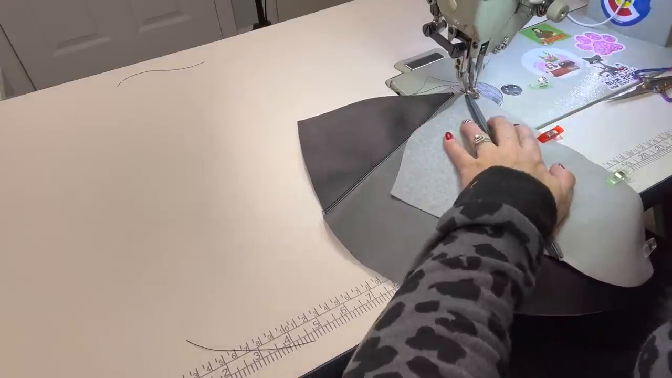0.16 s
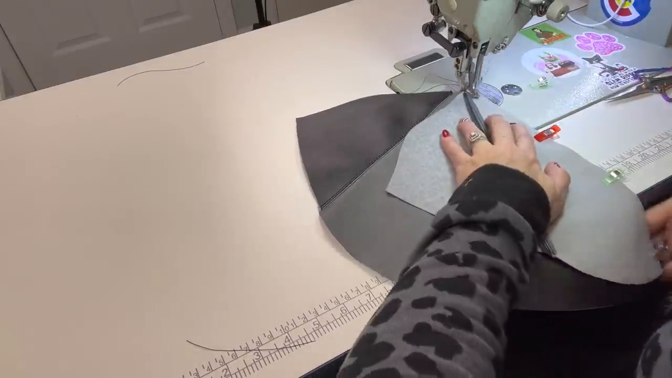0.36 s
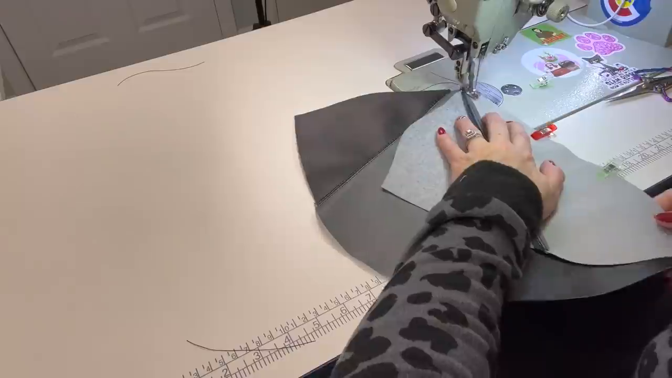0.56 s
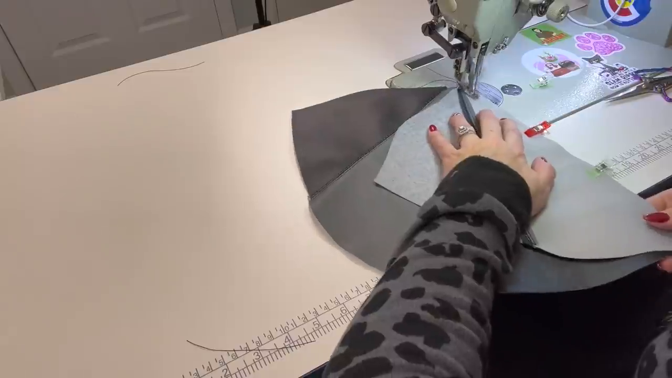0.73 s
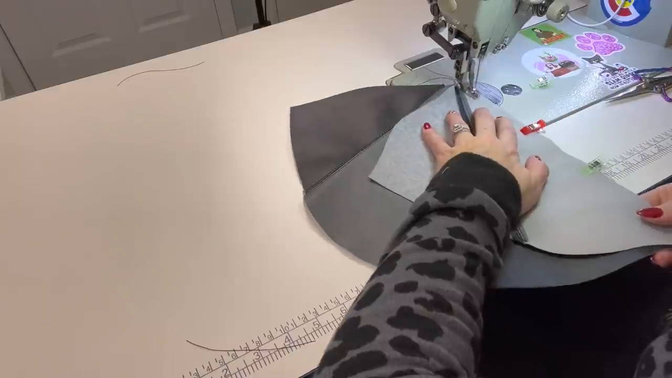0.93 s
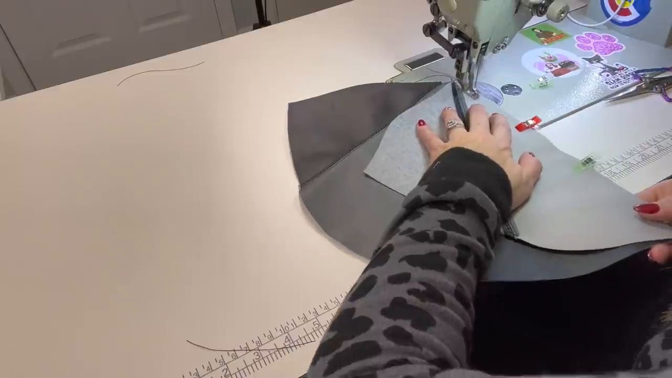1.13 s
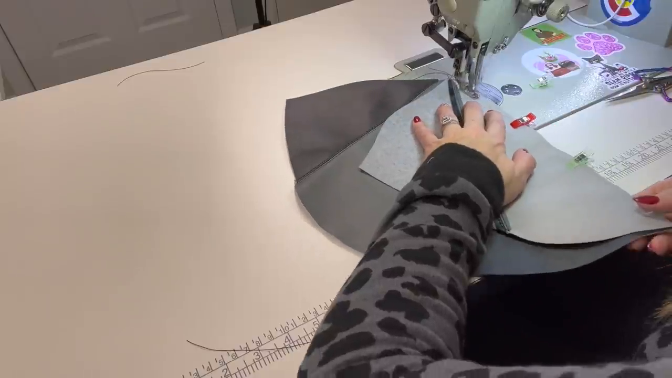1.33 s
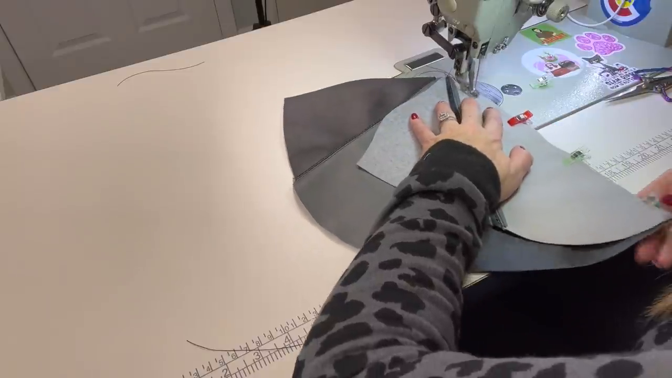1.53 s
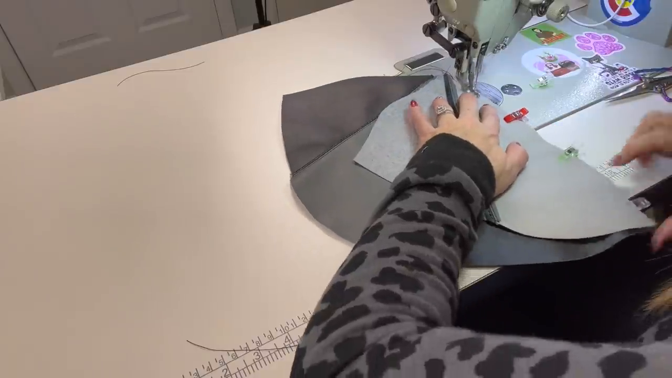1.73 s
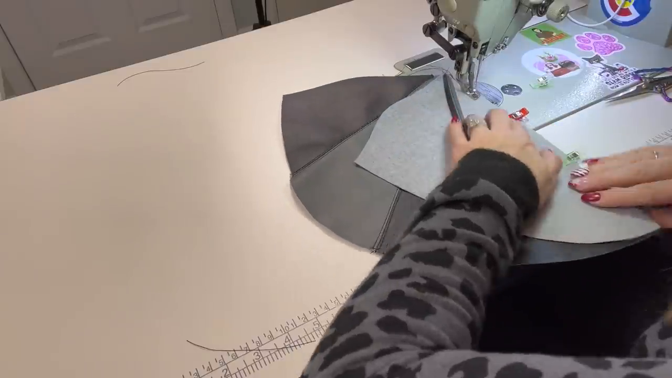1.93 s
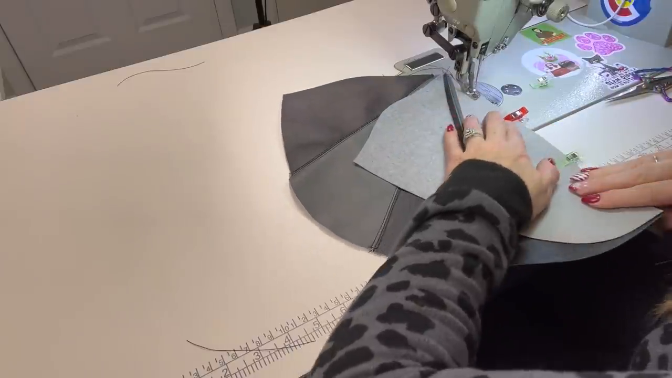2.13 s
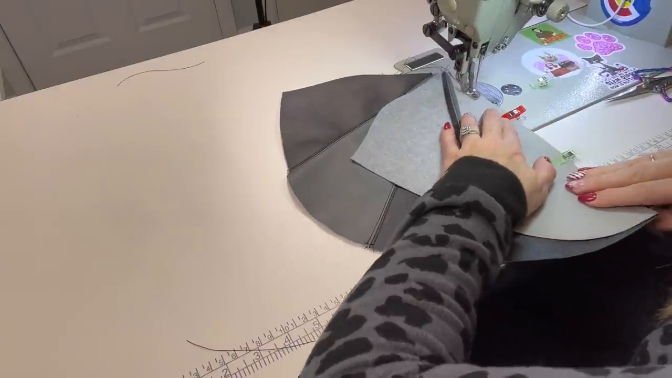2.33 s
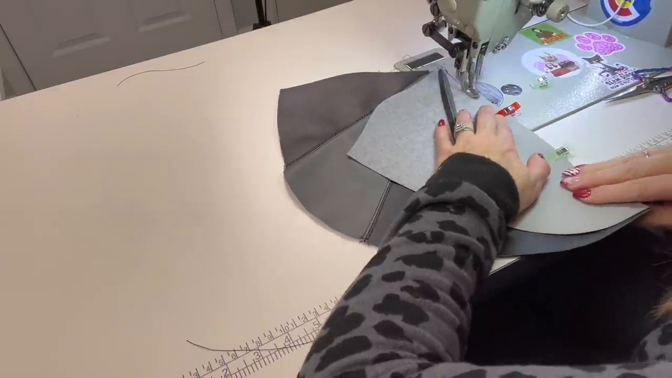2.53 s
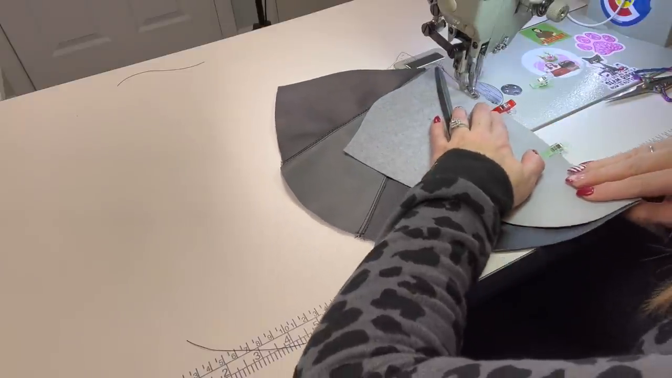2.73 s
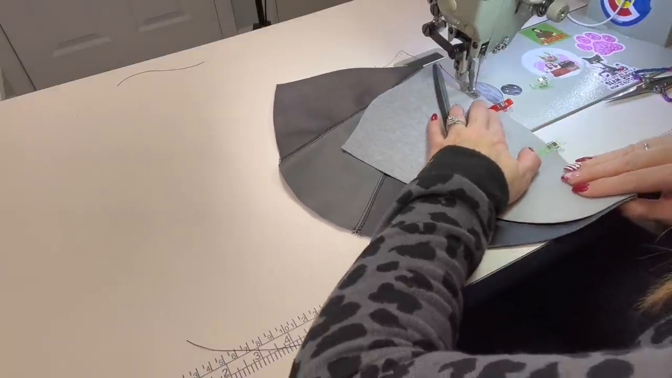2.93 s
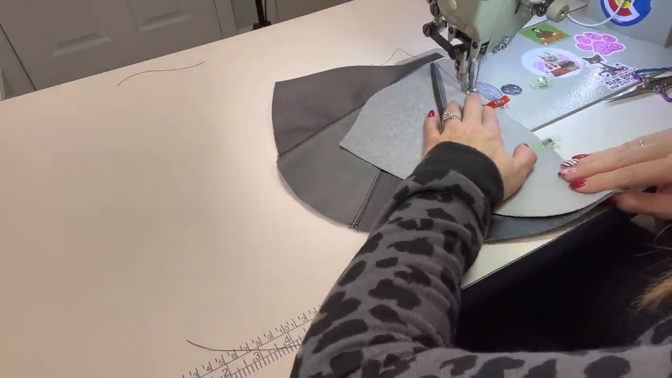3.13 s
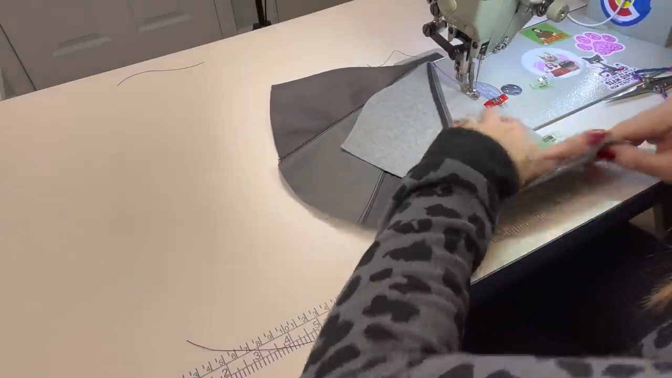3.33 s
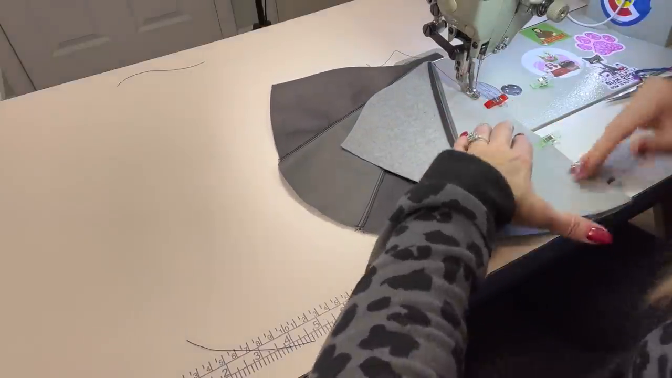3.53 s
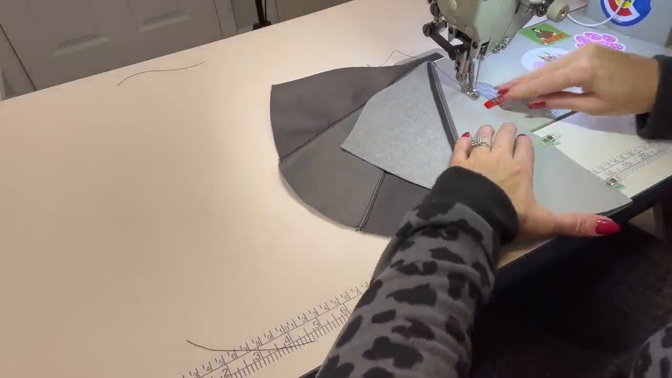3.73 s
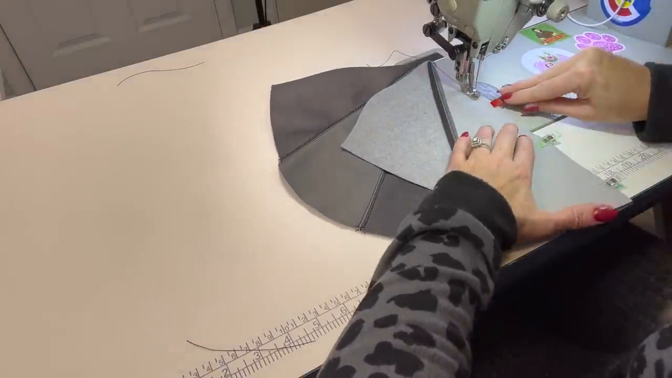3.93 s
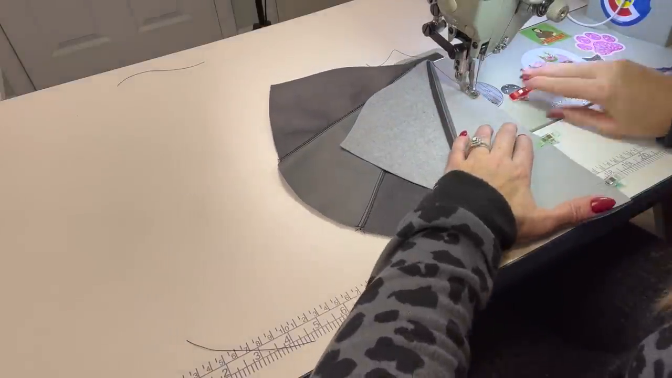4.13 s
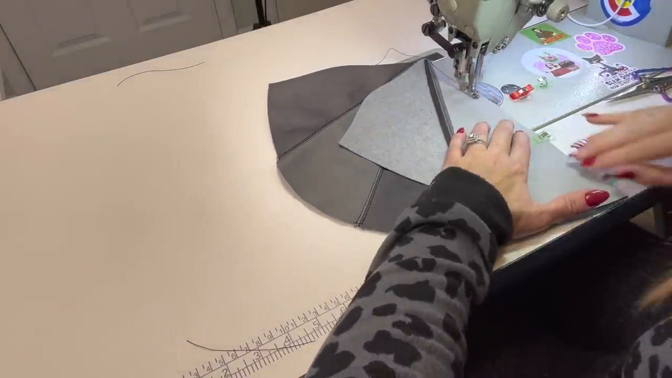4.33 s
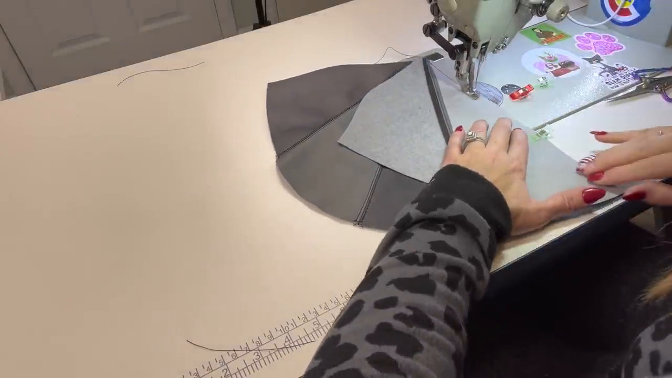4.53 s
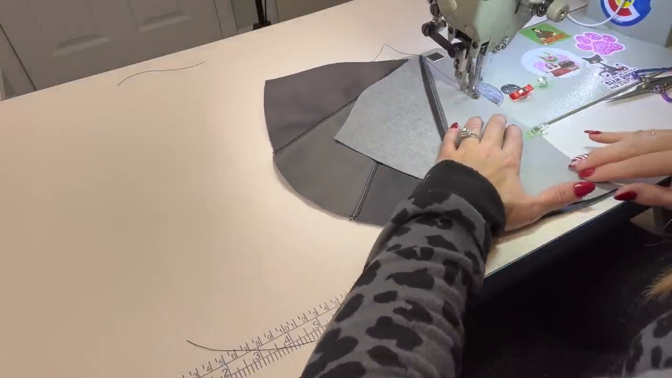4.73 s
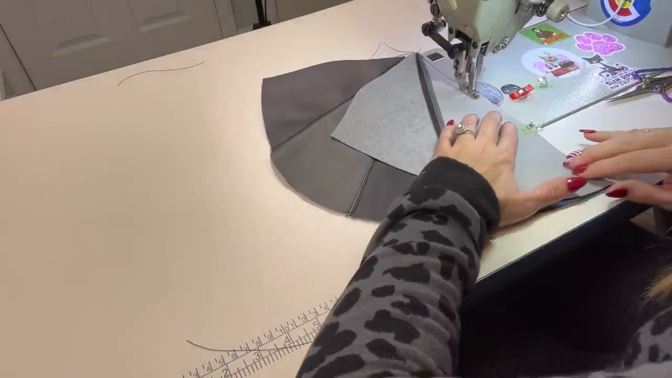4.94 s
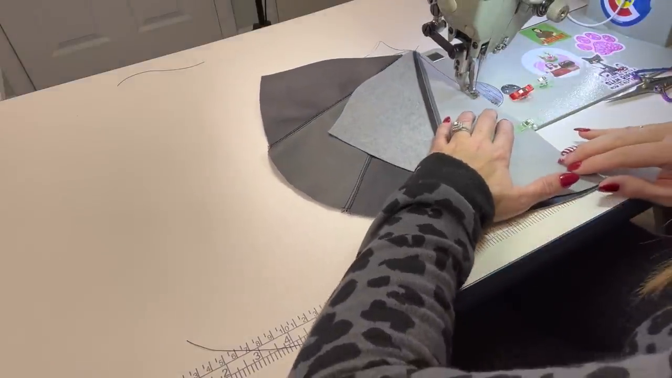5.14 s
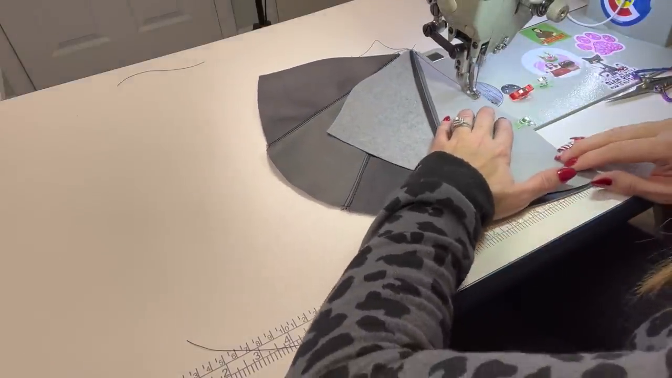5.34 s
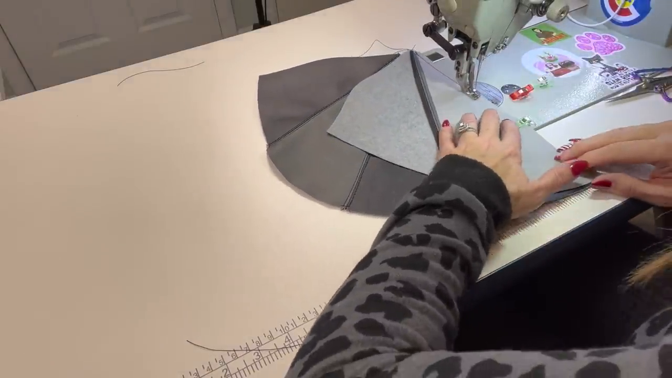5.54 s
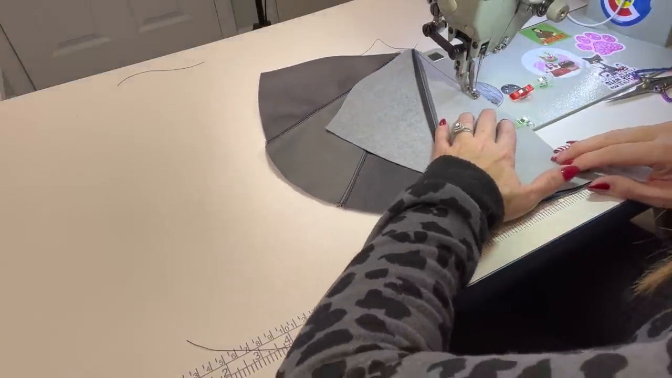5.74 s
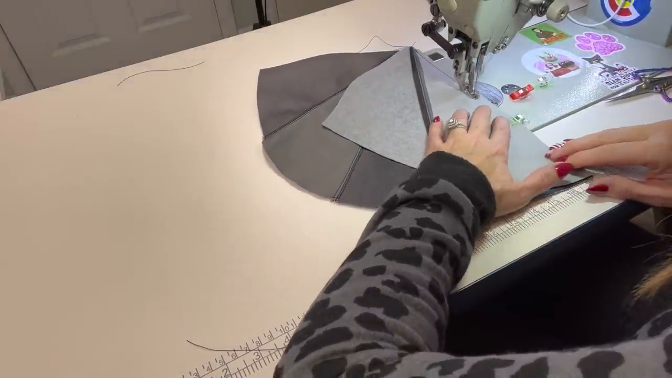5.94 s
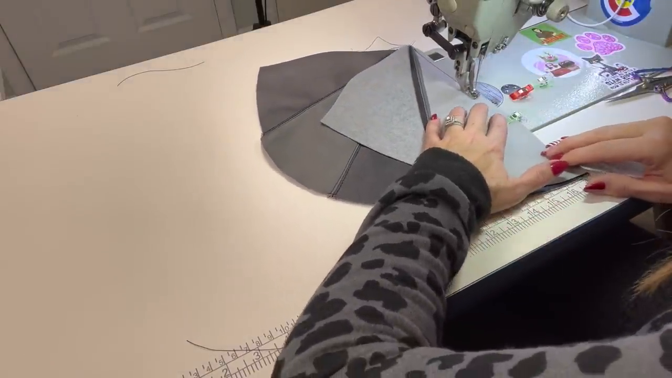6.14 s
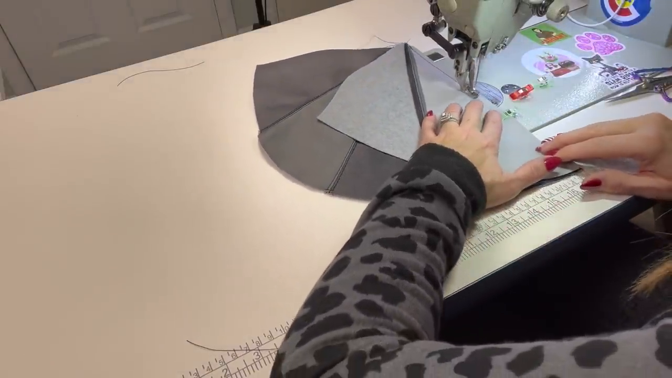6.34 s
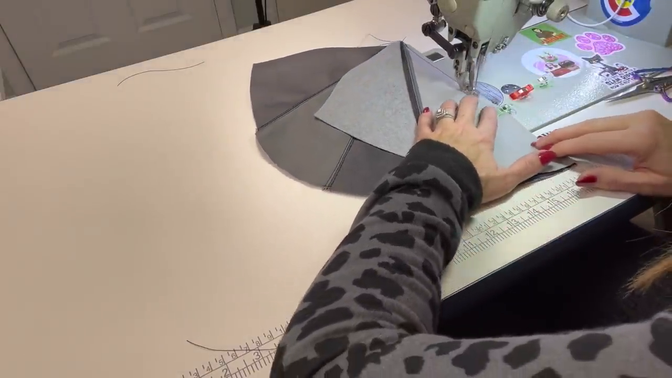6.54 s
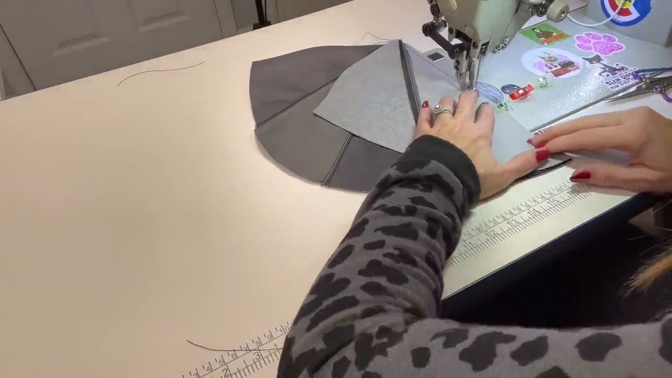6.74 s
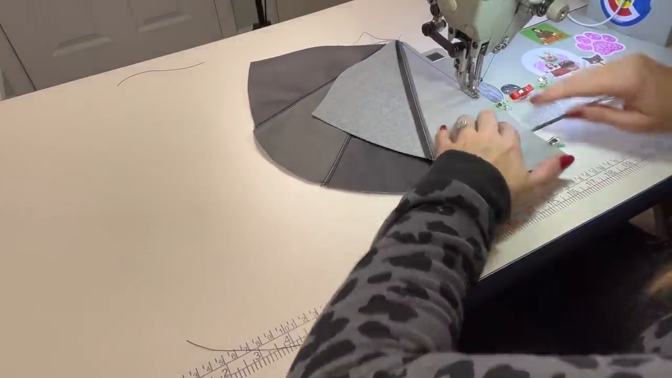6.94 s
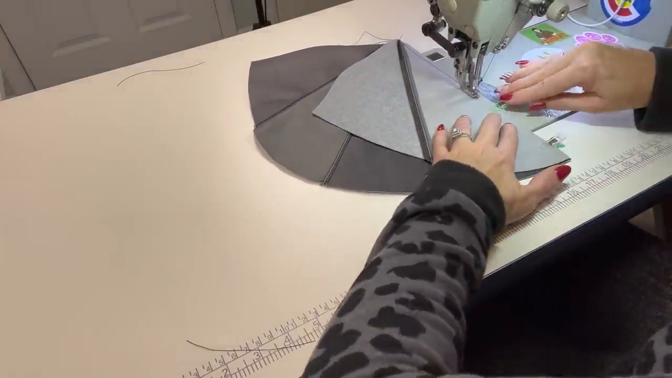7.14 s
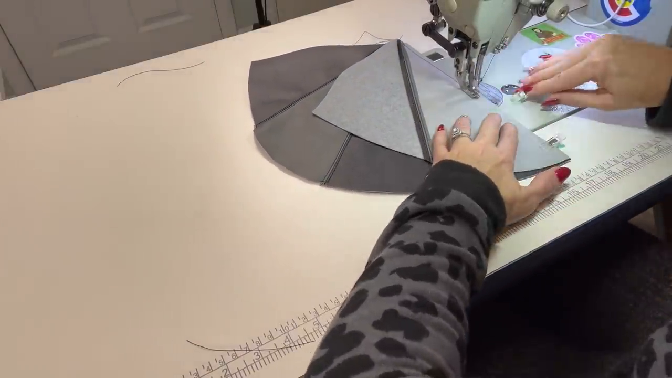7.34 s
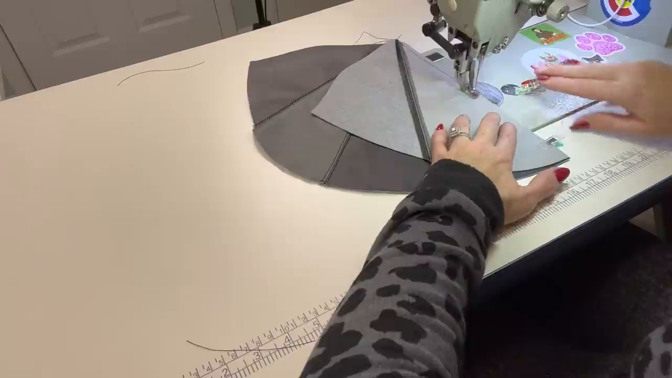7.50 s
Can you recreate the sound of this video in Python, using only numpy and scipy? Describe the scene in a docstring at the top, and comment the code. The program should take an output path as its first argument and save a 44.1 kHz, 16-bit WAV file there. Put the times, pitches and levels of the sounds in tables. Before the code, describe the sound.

An industrial sewing machine stitches in short stop-start bursts, knocking and rattling rapidly, with braking thuds, small clicks and a plastic clip dropping.

```python
"""A few small clicks come first, over a quiet room with a faint mains hum; then a sewing machine
stitches in short runs. Each shaft turn knocks the casting, clicks the hook and feed dogs and shakes
the table top. Braking jolts the table, and a plastic clip drops onto the machine bed.
Noise pushes and rubbing excite banks of resonances; a small room rings briefly and a phone
hears it all through two microphone ports."""
import sys
import numpy as np
from scipy import signal
from scipy.fft import rfft, irfft
from scipy.io import wavfile
from scipy.ndimage import uniform_filter1d

SR = 44100
rng = np.random.default_rng(int(sys.argv[2]) if len(sys.argv) > 2 else 0)


def generate_wav(signal):
    """Clip the signal to [-1, 1] and save it as 16-bit WAV at the path in sys.argv[1]."""
    frames = np.transpose(np.atleast_2d(signal))
    scaled = np.clip(frames, -1, 1) * 32767
    pcm = np.round(scaled).astype(np.int16)
    wavfile.write(sys.argv[1], SR, pcm)


N = 338247

# In all tables level_db is relative; other gains may follow.
# Colour of the room tone: pitch_hz, level_db
AIR_COLOUR = [(18, -59.5), (30, -21.5), (43, -14), (90, -21.5), (124, -4), (174, -18), (295, -20),
              (336, -23), (616, -24.5), (844, -30.5), (2200, -51), (16000, -72)]
AIR_LEVEL_DB, HUM_LEVEL_DB = -60.5, -62.5

# How much of each pitch the room returns: pitch_hz, level_db
ROOM_COLOUR = [(100, -23.5), (300, -13), (600, -3.5), (3000, -5), (7000, -4), (14000, 1.5)]
ROOM_T60_S, ROOM_TREBLE_T60_S = 0.48, 0.19  # time to fade by 60 dB
KNOCK_ROOM_DB, CRACK_ROOM_DB = -4, -9  # these sound close by, so the room gets less of them

# Phone shell, lead of the left port: pitch_hz, phase_radians
PORT_PHASE = [(20, 0), (100, -.1), (300, -.4), (700, -1.3), (1400, -1.6), (2600, -3.6), (4400, -5),
              (5900, -6.2), (6300, -9.4), (8500, -9.5), (10200, -12.6), (12700, -12.4), (14000, -15.8)]
# Phone shell, left port minus right: pitch_hz, level_db
PORT_GAIN = [(60, 2), (110, -2), (200, 2), (380, -1.5), (700, -5), (1290, -2), (2380, -0.5), (4400, -4),
             (8120, -1.5), (15000, 1)]
TOP_HZ = 16400  # nothing is heard above this

# Plastic clip landing and bouncing on the bed: start_s, level_db
CLIP_BOUNCES = [(3.537, -35.5), (3.557, -41), (3.573, -45)]
# Resonances of that landing: pitch_hz, width_hz, level_db
CLIP_RING = [(497, 250, -8), (800, 170, -2.5), (966, 130, -1.5), (1600, 460, -5.5), (2580, 450, -12),
             (4300, 340, -5)]

CRACKS = [(1.8213, -21), (3.5368, -15)]
# Their tone: pitch_hz, level_db
CRACK_COLOUR = [(300, -16), (1200, -5.5), (3200, -2.5), (4300, 1), (5600, -12.5), (7000, -2.5), (12000, -3),
                (16000, 0)]

# Dull knock as the drive takes hold: start_s, level_db
CATCH = [(7.447, -34)]
# Its resonance: pitch_hz, width_hz (one pass), level_db
CATCH_RING = [(900, 1000, 9.1)]

# Jolts of the table as the motor brakes: start_s, level_db, legs_level_db (added for the legs)
JOLTS = [(1.786, -28.5, -3), (1.812, -24.5, -0.5), (3.335, -28, -10), (3.384, -35, -25), (5.401, -32.5, -1),
         (6.88, -33.5, -2)]
# Tone of the thud: pitch_hz, level_db
THUD_COLOUR = [(30, -14), (60, -20), (150, 9), (300, -6), (500, -6.5), (900, -32)]
# Resonance of the table legs: pitch_hz, width_hz, level_db
LEGS_RING = [(56.7, 6, 21)]
BRAKE_RISE_S, BRAKE_FALL_S, BRAKE_SHAKE_DB = 0.045, 0.077, -21  # braking swell, against the jolt

# Lone clicks of slack taken up, of braking and of hands: start_s, level_db, pitch_hz
LONE_CLICKS = [(0.0233, -41.5, 10900), (0.046, -41, 10900), (0.0563, -32, 4400), (0.3047, -26, 4400),
               (1.8222, -28, 4740), (1.829, -40, 4530), (2.147, -37.5, 4250), (2.2154, -40, 4673),
               (2.2293, -32, 4480), (2.2528, -22, 4400), (2.2661, -22.5, 4400), (3.481, -47, 1590),
               (4.0721, -39, 4400), (4.1679, -24.5, 4400), (4.1984, -24.5, 13400), (4.21, -29, 12800),
               (5.6935, -34.5, 9000), (5.778, -36, 4500), (5.7977, -24, 9100), (7.3098, -42.5, 11800),
               (7.3345, -44, 9800), (7.3597, -38, 10600), (7.3746, -32, 5130), (7.381, -34, 2110),
               (7.386, -35.5, 4570), (7.447, -42, 10800)]
# Clicks in each turn, hook then feed dogs: start_s, level_db, pitch_hz
TURN_CLICKS = [(0.467, -25.5, 4300), (0.4956, -30.5, 3800), (0.604, -24.5, 3630), (0.6251, -28, 4650),
               (0.7187, -27.5, 5500), (0.7412, -27, 3820), (0.8557, -26.5, 4550), (0.9557, -29.5, 4460),
               (0.9773, -31, 4900), (1.075, -32, 4300), (1.096, -28.5, 4760), (1.192, -31, 4430),
               (1.3106, -23, 3330), (1.3347, -26.5, 3420), (1.4322, -27.5, 4100), (1.452, -30.5, 4400),
               (1.5515, -27, 3320), (1.5717, -30, 4450), (1.6658, -26, 3300), (1.6926, -26.5, 5530),
               (2.374, -25, 4410), (2.3925, -30, 4450), (2.5091, -27, 4540), (2.6042, -24.5, 4400),
               (2.6251, -28.5, 4500), (2.7235, -33, 4380), (2.7423, -25.5, 4600), (2.8342, -24.5, 4600),
               (2.8584, -24.5, 4500), (2.949, -25.5, 4300), (2.9717, -27.5, 4550), (3.064, -29, 4500),
               (3.0865, -27, 3800), (3.1814, -26.5, 4300), (3.2153, -31.5, 5000), (4.311, -32, 4400),
               (4.3365, -32.5, 3820), (4.4773, -29.5, 4660), (4.584, -27, 3290), (4.6056, -34, 4620),
               (4.7105, -32, 4340), (4.7311, -25.5, 3940), (4.839, -28, 4270), (4.931, -28.5, 4300),
               (4.9485, -28, 4570), (5.039, -26.5, 4700), (5.061, -23, 3640), (5.146, -24.5, 4390),
               (5.168, -30, 4400), (5.2596, -33, 4460), (5.277, -26, 3370), (5.9254, -27.5, 4450),
               (6.057, -30, 3140), (6.0828, -29.5, 3280), (6.1556, -33, 4620), (6.182, -36, 4700),
               (6.261, -42, 4400), (6.276, -31, 4270), (6.354, -35, 4570), (6.3713, -38, 5800),
               (6.4474, -37.5, 4730), (6.4717, -27, 3940), (6.638, -25.5, 3200), (6.6547, -28.5, 4670),
               (6.751, -39, 4480), (6.7732, -27.5, 4600), (7.5161, -29, 4420), (7.5391, -29.5, 4470),
               (7.644, -31, 4480)]

# Needle bar knocks, one per turn; the last row only closes the final turn: start_s, level_db
STITCHES = [(0.221, -36), (0.4311, -35), (0.572, -27.5), (0.689, -26.5), (0.8055, -30), (0.923, -27.5),
            (1.042, -32), (1.1584, -31.5), (1.28, -28), (1.3985, -28.5), (1.5179, -31), (1.6357, -31),
            (1.783, -35), (2.3402, -29.5), (2.4576, -27.5), (2.574, -25.5), (2.6893, -27.5), (2.804, -25),
            (2.9196, -28), (3.034, -27), (3.15, -29), (3.31, -36), (4.274, -27.5), (4.4127, -27.5),
            (4.5503, -26), (4.6788, -29.5), (4.7896, -38), (4.9029, -27), (5.0133, -30), (5.1206, -36),
            (5.228, -26.5), (5.3501, -55), (5.89, -29), (6.025, -29), (6.136, -27.5), (6.234, -30),
            (6.328, -25.5), (6.422, -28), (6.5151, -31), (6.6105, -25.5), (6.7161, -32), (6.8397, -61),
            (7.478, -27.5), (7.6148, -30.5), (7.73, -35)]
# Resonances of a knock: pitch_hz, width_hz, level_db
KNOCK_RING = [(1383, 140, 3), (1640, 136, 6), (2310, 90, 0.5), (2730, 150, -1.5), (3293, 97, 0),
              (4450, 450, -10)]
KNOCK_SCATTER_DB, KNOCK_PITCH_SCATTER = 1.5, .025  # stroke to stroke: level, share of the pitch

# Stitching runs: start_s, halt_s, first_turn_hz (turns a second)
RUNS = [(0.031, 2.097, 2.43), (2.147, 3.72, 3.64), (4.074, 5.655, 4.1), (5.697, 7.053, 4.36),
        (7.303, 8.0, 1.56)]
SPIN_UP_S, STILL_HZ = 0.045, 0.47  # time to take up the drive; turns a second that stand for rest
CRUISE_HZ = 8.5  # turns a second at which the gains below hold
# gain_db at cruise, then db per doubling of speed: below cruise, above cruise
SHAKE_PACE = (-45, 9.6, 14.5)
GRIND_PACE = (-49.5, 10.03, 6.3)
RATTLE_PACE = (-51.5, 10.3, 7.9)
CAM_PACE = (-51, 13.8, -10)

# One shaft turn: angle_turns (0-1), grind_db, rattle_db, cam_rub_db
TURN = [(0, 6, -9.5, -4), (0.201, 0, -8.5, -3.5), (.3, 1, -9, 5.5), (.5, 2.5, -7.5, -4), (.75, -4, -13, -7),
        (.95, -2.5, -11.5, -9), (1, 6.5, -10, 19)]
# Resonances of the table top: pitch_hz, width_hz (one pass), level_db
TABLE_RING = [(61.7, 34, -6), (121.4, 25, 1), (184.7, 16.3, 2), (212.6, 31, -4.5), (302, 24.4, -1),
              (334.6, 26.6, -3.5)]
# Resonances of the casting: pitch_hz, width_hz, level_db
CASTING_RING = [(529, 176, 6), (791, 39, 9), (1075.6, 16.6, 2), (1405, 35, 8.5), (1618, 43, 2.5),
                (2263, 89, 10.5), (2435, 38, 1.5)]
# Resonances of the linkage: pitch_hz, width_hz, level_db
LINKAGE_RING = [(2224, 35, 4.5), (3280, 28, 16.5), (4400, 460, 5.5), (4515, 20, 17.5), (5760, 47, -30.5),
                (9490, 180, -4.5), (10500, 660, -28.5), (12550, 1080, 4.5)]
# Tone of the rattle: pitch_hz, level_db
RATTLE_COLOUR = [(1500, -11), (3000, 4.5), (5000, 1), (7000, 4), (10000, -7.5), (13000, -6), (14500, -7),
                 (16500, -84)]
# Tone of the grinding: pitch_hz, level_db
GRIND_COLOUR = [(250, -34), (400, 3.5), (700, 3), (1500, 1), (2500, 1.5), (4000, -2.5), (8000, -22)]
# Resonances of the feed cam: pitch_hz, width_hz, level_db
CAM_RING = [(659, 13, 0), (1079, 14, -6)]
CAM_ANGLE = .27  # part of a turn at which the cam strikes

# The two drones over time: start_s, low_level_db, upper_level_db
DRONE_LEVELS = [(0.0, -90, -68), (0.1, -59.5, -65.5), (0.79, -41, -57.5), (1.71, -46, -54.5),
                (1.77, -56, -65), (1.859, -47, -51), (2.01, -72, -80), (2.539, -40, -48), (3.1, -40.5, -54),
                (3.22, -43, -61), (3.35, -62, -48.5), (3.69, -88, -75), (4.23, -52.5, -70),
                (4.29, -44, -55.5), (5.26, -47.5, -51.5), (5.36, -45, -63.5), (5.45, -49, -52.5),
                (5.68, -81, -87), (5.85, -49, -59.5), (6.15, -42.5, -52), (6.81, -48.5, -56.5),
                (6.88, -60, -54.5), (7.13, -86, -87), (7.63, -41.5, -56), (7.67, -55, -64)]
LOW_DRONE_HZ, UPPER_DRONE_HZ = 146.5, 244.3
DRONE_WAVER_HZ, DRONE_FLUTTER_DB = 0.9, 1.82  # typical (rms) drift of pitch and of level


def undb(db):
    """Turn decibels into a plain multiplier."""
    return 10 ** (np.asarray(db) / 20)


def level(x, db):
    """Scale to an rms level."""
    return x * undb(db) / np.sqrt(np.mean(x ** 2))


def across(table, size=N):
    """Read a (pitch_hz, value) table at every bin of a spectrum, on a log pitch scale."""
    hz, value = np.transpose(table)
    bins_hz = np.fft.rfftfreq(size, 1 / SR)
    return np.interp(np.log(bins_hz + 1), np.log(hz + 1), value)


def colour(x, table, size=4096):
    """Filter with a table of gains; folding the cepstrum makes the response start at once."""
    cepstrum = irfft(np.log(undb(across(table, size=size))))
    cepstrum[1:size // 2] *= 2
    cepstrum[size // 2 + 1:] = 0
    response = irfft(np.exp(rfft(cepstrum)))
    return signal.oaconvolve(np.atleast_2d(x), [response], axes=1)[:, :N]


def ring(x, modes):
    """Sum a bank of resonances, alternating in sign."""
    total = 0
    for k, (hz, width_hz, db) in enumerate(modes):
        b, a = signal.iirpeak(hz, hz / width_hz, SR)
        total = total + (-1) ** k * undb(db) * signal.lfilter(b, a, x)
    return total


def double_ring(x, modes):
    """Sum resonances passed through twice, so each falls away more steeply beside its peak."""
    return sum(ring(ring(x, [(hz, width_hz, db)]), [(hz, width_hz, 0)]) for hz, width_hz, db in modes)


def blows(table, t60, firm, apart=0.94, rise=0.0017):
    """A push at each row: a firm contact, then fading noise that the two ports hear partly apart."""
    t = np.arange(int(2 * t60 * SR)) / SR
    shape = (1 - np.exp(-t / rise)) * 1000 ** (-t / t60)
    contact = firm * (t == 0) * np.sqrt(t60 * SR / 14)
    out = np.zeros((2, N + len(t)))
    for start_s, db, *_ in table:
        noise = rng.standard_normal((3, len(t)))
        push = contact + (noise[0] + apart * noise[1:]) * shape
        out[:, int(start_s * SR):][:, :len(t)] += undb(db) * push
    return out[:, :N]


def rubbing(taps_per_s, spread_db, apart):
    """Noise swollen by random taps of loose parts; it is spread out, so the two ports differ."""
    strength = undb(spread_db * np.minimum(rng.exponential(size=N), 3.5))
    taps = (rng.random(N) < taps_per_s / SR) * strength
    size = 1 + signal.lfilter([1], [1, -np.exp(-1 / (0.0026 * SR))], taps)  # each fades over 2.6 ms
    noise = rng.standard_normal((3, N))
    return level(size * (noise[0] + apart * noise[1:]), 0)


def air():
    """Room tone from coloured noise, apart at the ports above the bass, with a resonant mains hum."""
    hum = ring(rng.standard_normal(N), [(57.4, 5.8, -6.5), (115.4, 5.0, -1.0), (297.0, 42.0, -9.5)])
    mid, side = (level(colour(rng.standard_normal(N), AIR_COLOUR), AIR_LEVEL_DB) for _ in range(2))
    side = signal.sosfilt(signal.butter(2, 300, "high", fs=SR, output="sos"), side)
    return mid + side * np.array([[1], [-1]]) + level(hum, HUM_LEVEL_DB)


def room(x):
    """Walls answer with a fading noise tail whose treble dies sooner."""
    t = np.arange(SR // 2) / SR
    low, high = (rng.standard_normal((2, len(t))) * 1000 ** (-t / t60)
                 for t60 in (ROOM_T60_S, ROOM_TREBLE_T60_S))
    split = signal.butter(2, 2500, fs=SR, output="sos")
    tail = signal.sosfilt(split, low - high) + high  # slow fade below the split, quick above
    tail *= (t > .004) / np.sqrt(np.sum(tail ** 2) / 2)
    return signal.oaconvolve(colour(x, ROOM_COLOUR), tail, axes=1)[:, :N]


def phone_ports(x):
    """The phone's shell delays and shades the left port differently at each pitch."""
    half_gain = undb(across(PORT_GAIN) / 2)
    ports = np.array([half_gain * np.exp(1j * across(PORT_PHASE)), 1 / half_gain])
    return irfft(rfft(x) * ports, N)


def clip_drop():
    """Each bounce of the plastic clip pushes a few broad resonances."""
    return 5 * ring(blows(CLIP_BOUNCES, 0.071, 0.71), CLIP_RING)


def cracks():
    """Very fast, short noise bursts sound as sharp cracks across the full range."""
    return colour(blows(CRACKS, 0.012, 0.26, apart=0.19, rise=0.00021), CRACK_COLOUR)


def drive_catch():
    """A short push through one very broad resonance makes a dull knock."""
    return double_ring(blows(CATCH, 0.017, 0.72), CATCH_RING)


def brake_jolts():
    """Braking thuds the table and sets its legs swaying at a low resonance."""
    jolt = blows(JOLTS, 0.11, 0.4, apart=.1, rise=0.0065)
    leg_rows = [(start_s, db + legs_db) for start_s, db, legs_db in JOLTS]
    sway = blows(leg_rows, 0.06, 0.88, apart=.05, rise=0.006)
    return 3 * (colour(jolt, THUD_COLOUR) + ring(sway, LEGS_RING))


def clicks():
    """Each click is a crack through linkage and casting plus a short ring at its own pitch."""
    rows = LONE_CLICKS + TURN_CLICKS
    push = blows(rows, .025, 0.19, apart=0.9)
    out = .5 * colour(push, RATTLE_COLOUR)
    out += 0.47 * ring(push, LINKAGE_RING) + 0.43 * ring(push, CASTING_RING)
    t = np.arange(1024) / SR
    for start_s, db, hz in rows:
        tone = 0.5 * undb(db) * np.sin(2 * np.pi * hz * t) * 1000 ** (-t / 0.013)
        part = out[:, int(start_s * SR):][:, :len(t)]
        part += tone[:part.shape[1]]
    return out


def drone(hz):
    """A table tone kept singing by the motor; its pitch wavers a little and its level flutters."""
    def drift():
        smooth = uniform_filter1d(rng.standard_normal(N), size=3000)
        return level(uniform_filter1d(smooth, size=3000), 0)

    turns = np.cumsum(hz + DRONE_WAVER_HZ * drift()) / SR
    return np.sqrt(2) * undb(DRONE_FLUTTER_DB * drift()) * np.sin(2 * np.pi * turns)


def shaft(t):
    """Shaft angle (turns, 0-1) and speed (turns a second), from the starts, knocks and halts."""
    points, marks = [], []
    for start, halt, first_hz in RUNS:
        times = [start] + [knock for knock, _ in STITCHES if start < knock < halt]
        marks += times
        points += [(start - SPIN_UP_S, STILL_HZ), (start, first_hz)]
        points += [((times[0] + times[1]) / 2, first_hz)]
        points += [((a + b) / 2, 1 / (b - a)) for a, b in zip(times[1:], times[2:])]
        points += [(halt, STILL_HZ)]
    at, hz = np.transpose(points)
    angle = np.interp(t, marks, np.arange(len(marks))) % 1
    return angle, np.exp(np.interp(t, at, np.log(hz)))


def pace_gain(speed, setting):
    """Moving parts get louder or softer as the shaft speeds up."""
    cruise_db, slow_db, fast_db = setting
    doublings = np.log2(speed / CRUISE_HZ)
    return undb(cruise_db + np.where(doublings < 0, slow_db, fast_db) * doublings)


def table_top(t, turn, speed):
    """The drive shakes the table's resonances, more while braking, and two drones sing along."""
    shake = pace_gain(speed, SHAKE_PACE)
    for start_s, db, _ in JOLTS:
        swell = np.exp(np.minimum((t - start_s) / BRAKE_RISE_S, (start_s - t) / BRAKE_FALL_S))
        shake = shake + undb(BRAKE_SHAKE_DB + db) * swell
    # gears repeat their unevenness every turn, so part of the shaking is periodic
    teeth = np.interp(turn, np.linspace(0, 1, num=400), rng.standard_normal(400))
    drive = level(teeth, 0) + 2.34 * rubbing(28, 3.6, 0.81)
    top = level(double_ring(drive, TABLE_RING), 0) * shake
    at, *columns = np.transpose(DRONE_LEVELS)
    low, upper = (undb(np.interp(t, at, column)) for column in columns)
    return top + low * drone(LOW_DRONE_HZ) + upper * drone(UPPER_DRONE_HZ)


def grinding(speed, grind_turn):
    """Rubbing parts scrape and excite the casting, shaped by the angle of the shaft."""
    scrape = rubbing(170, 4.14, 1.0) * grind_turn
    body = level(colour(scrape, GRIND_COLOUR), 0) + level(ring(scrape, CASTING_RING), -1.66)
    return level(body, 4.32) * pace_gain(speed, GRIND_PACE)


def feed_cam(turn, speed, cam_turn):
    """The cam strikes once a turn with a soft contact, rubs in between, and rings."""
    strike = np.diff(1. * (turn > CAM_ANGLE), prepend=1) > 0
    uneven = strike * undb(1.9 * rng.standard_normal(N))
    push = level(uniform_filter1d(uneven, size=30), 1) + .2 * rubbing(100, 3, .4) * cam_turn
    return level(ring(push, CAM_RING), -5) * pace_gain(speed, CAM_PACE)


def rattling(speed, rattle_turn):
    """Loose links chatter and excite the linkage, shaped by the angle of the shaft."""
    chatter = rubbing(110, 4.2, 0.25) * rattle_turn
    links = level(colour(chatter, RATTLE_COLOUR), 0) + level(ring(chatter, LINKAGE_RING), -6)
    return level(links, 3.08) * pace_gain(speed, RATTLE_PACE)


def machine():
    """The shaft drives the steady sounds of the running machine: (table top, head)."""
    t = np.arange(N) / SR
    turn, speed = shaft(t)
    angle, *columns = np.transpose(TURN)
    grind_turn, rattle_turn, cam_turn = (undb(np.interp(turn, angle, column)) for column in columns)
    head = grinding(speed, grind_turn) + feed_cam(turn, speed, cam_turn) + rattling(speed, rattle_turn)
    return table_top(t, turn, speed), head


def knocks():
    """The needle bar lands with a rounded contact; no two strokes ring the casting quite alike."""
    strokes = STITCHES[:-1]
    push = blows(strokes, .016, 2.2, apart=0.9, rise=.0015)
    out = np.zeros((2, N))
    for start_s, db in strokes:
        at = slice(int(start_s * SR), int((start_s + .085) * SR))
        modes = []
        for hz, width_hz, mode_db in KNOCK_RING:
            pitch_shift, level_shift = rng.standard_normal(2)
            modes.append((hz * (1 + KNOCK_PITCH_SCATTER * pitch_shift), width_hz,
                          mode_db + KNOCK_SCATTER_DB * level_shift))
        stroke = ring(uniform_filter1d(push[:, at], size=9), modes)
        out[:, at] += level(stroke, db - 18.5)
    return out


def scene():
    """All sources reach two ports directly; the head, knocks and cracks also return from the walls."""
    top, head = machine()
    head += clicks() + drive_catch() + clip_drop()
    knock, crack = knocks(), cracks()
    direct = top + head + knock + crack + brake_jolts()
    to_room = head + undb(KNOCK_ROOM_DB) * knock + undb(CRACK_ROOM_DB) * crack
    return phone_ports(direct + room(to_room)) + air()


def record(dry):
    """Soften the highest treble, then remove everything above TOP_HZ."""
    soft = signal.sosfilt(signal.butter(8, 14300, fs=SR, output="sos"), dry)
    return signal.sosfilt(signal.ellip(10, .2, 80, TOP_HZ, fs=SR, output="sos"), soft)


dry = scene()
out = record(dry)
generate_wav(out)
```